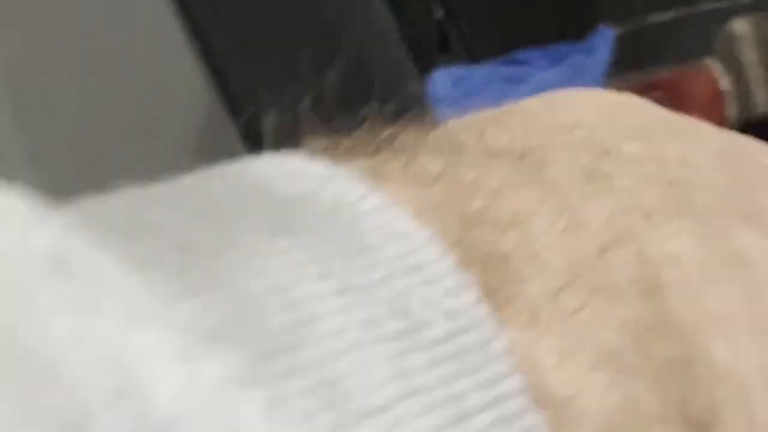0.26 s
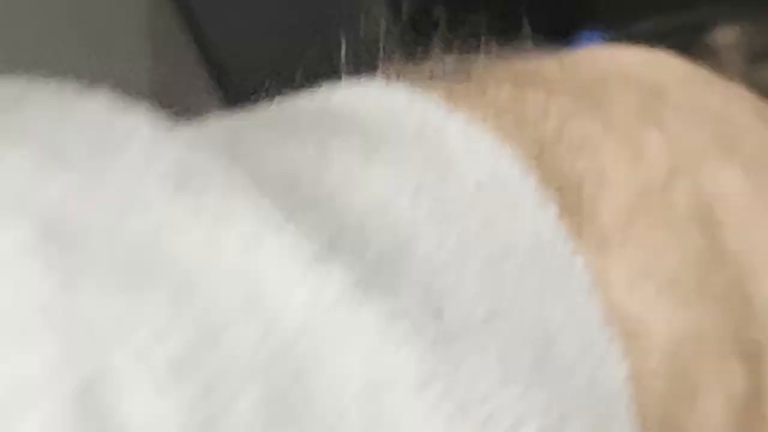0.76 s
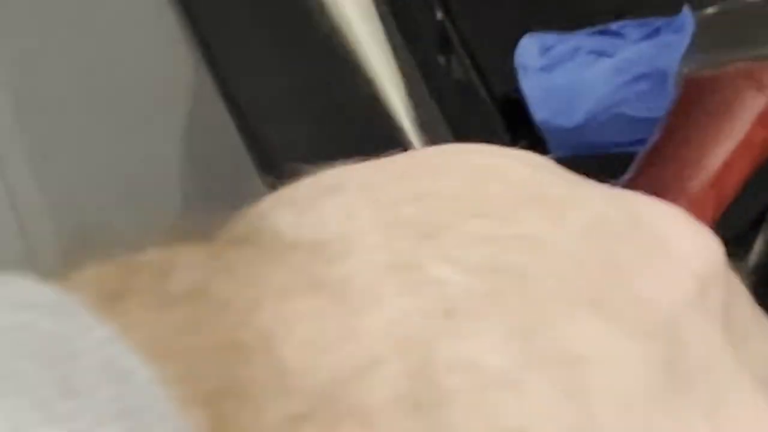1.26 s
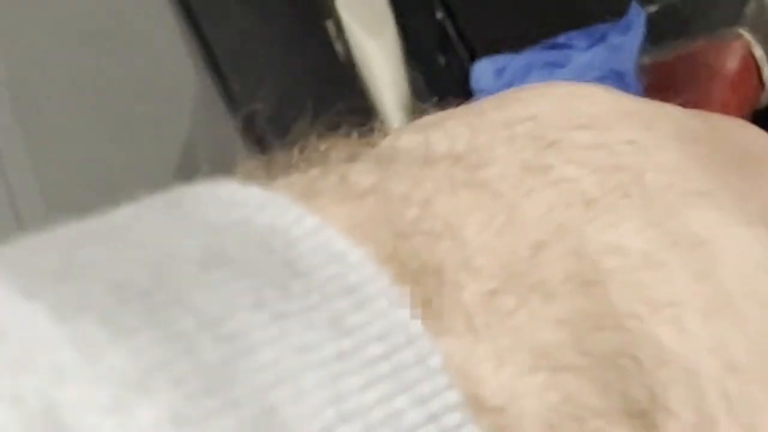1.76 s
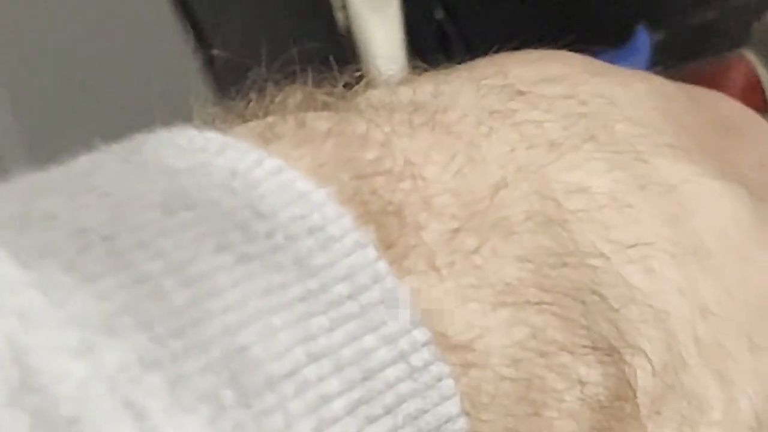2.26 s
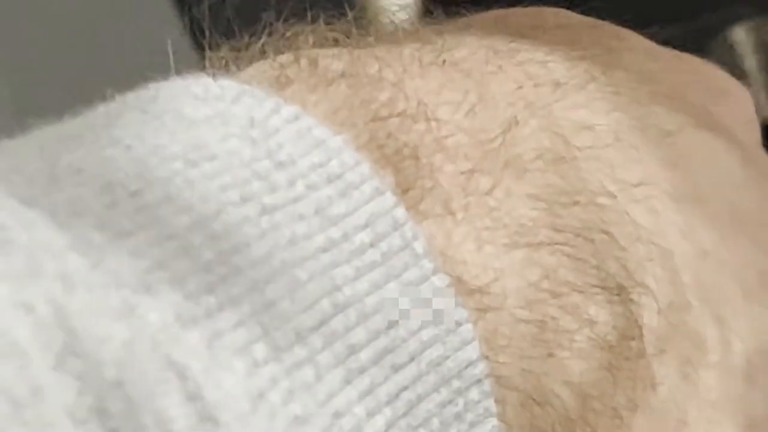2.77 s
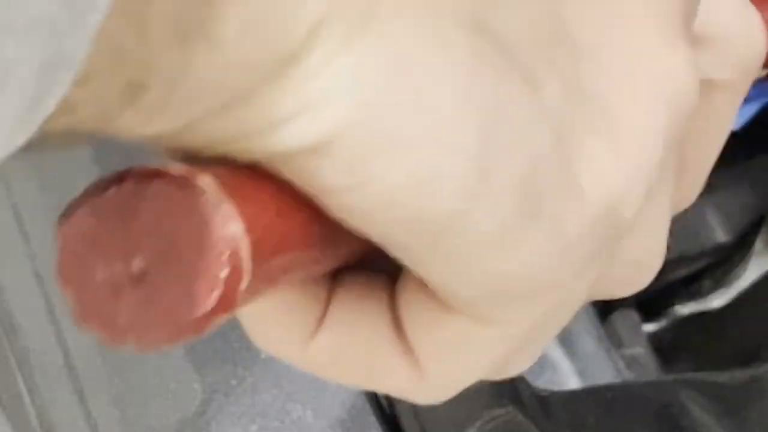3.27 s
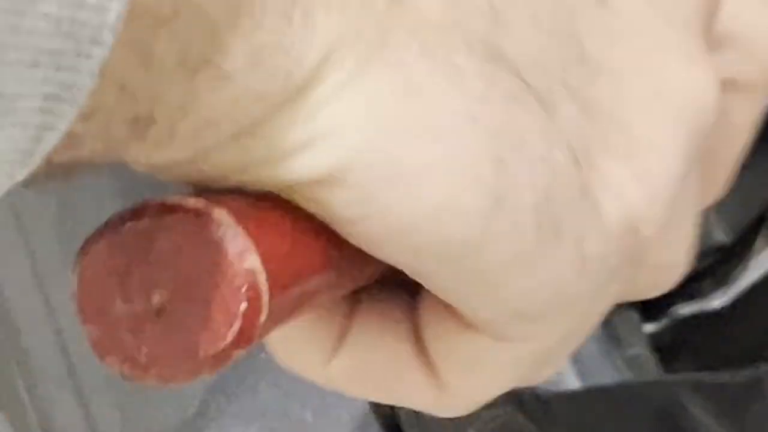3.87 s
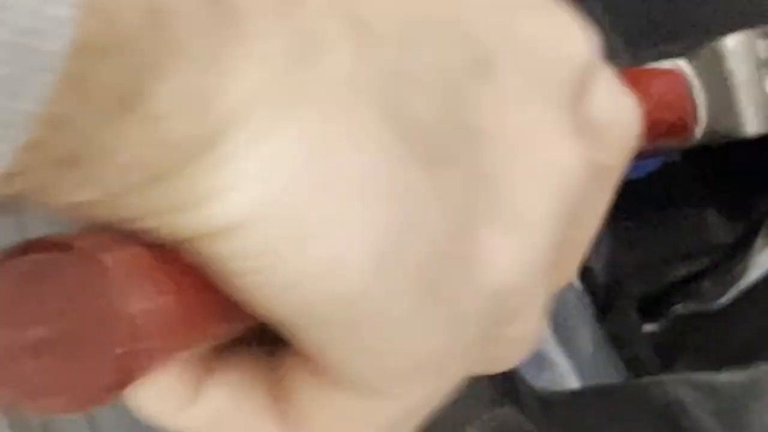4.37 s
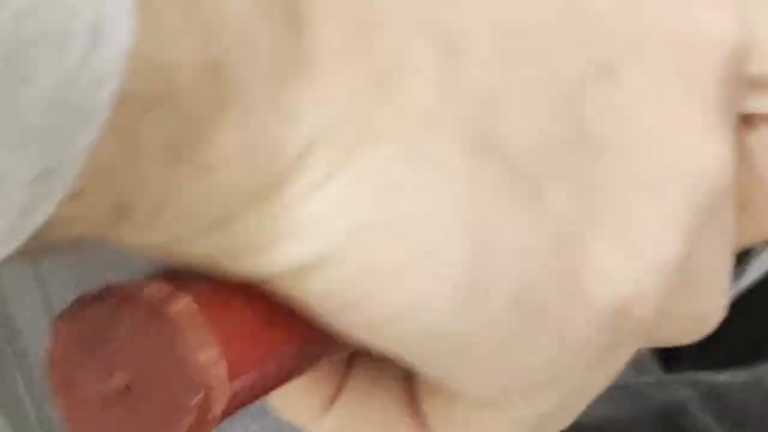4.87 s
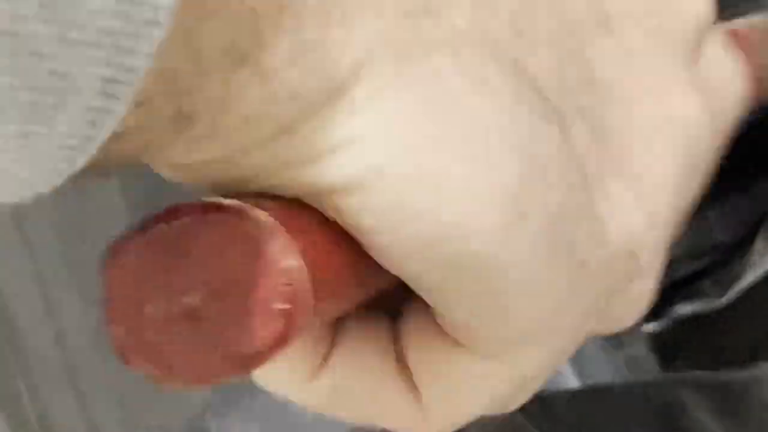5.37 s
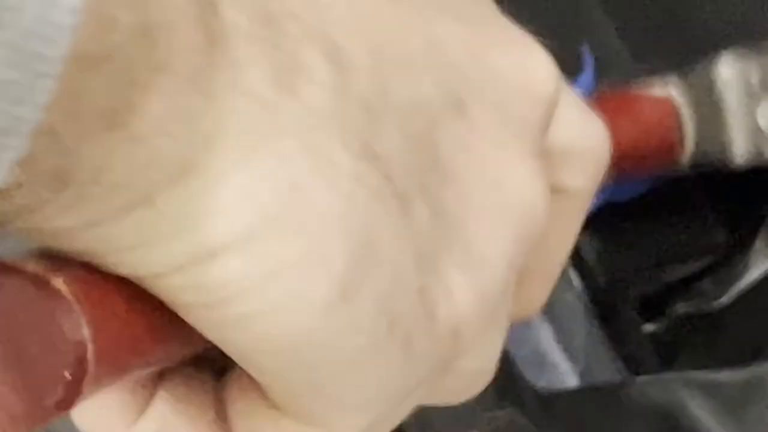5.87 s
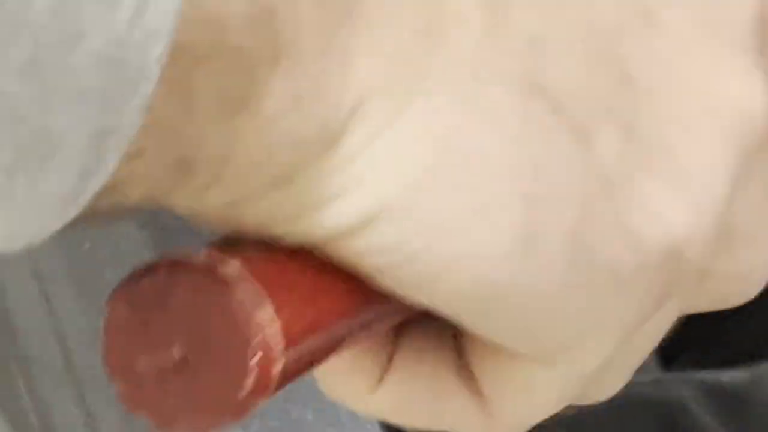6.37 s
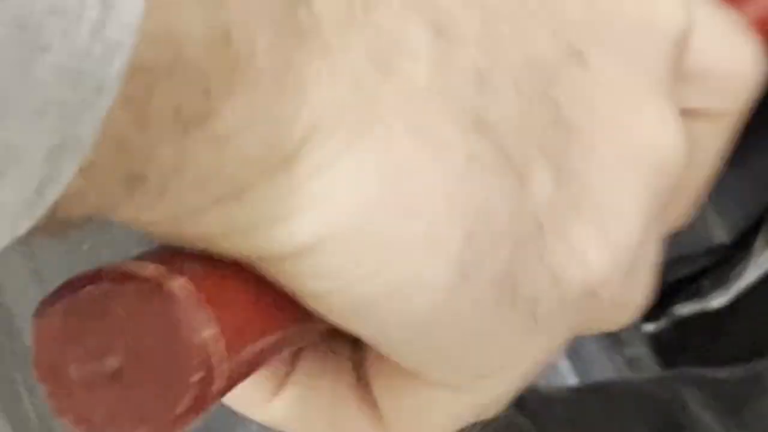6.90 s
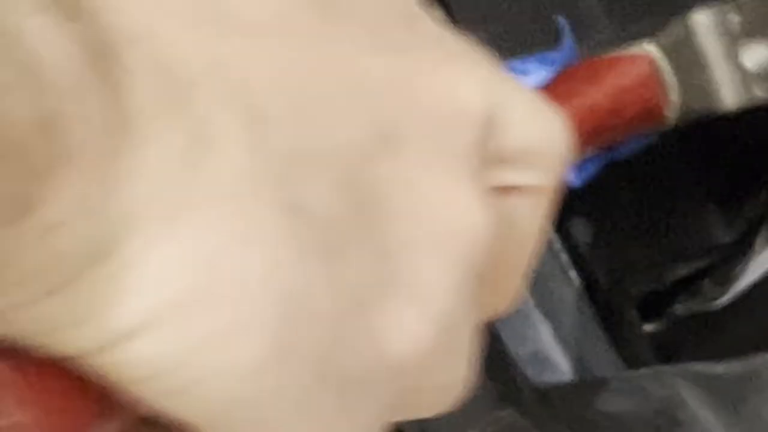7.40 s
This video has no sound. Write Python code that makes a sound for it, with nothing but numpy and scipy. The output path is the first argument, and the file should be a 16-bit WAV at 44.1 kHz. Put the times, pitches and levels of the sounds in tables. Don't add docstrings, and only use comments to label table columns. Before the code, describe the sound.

Close stereo pickup of hand metalwork: sparse, soft clinks on a bracket over low, bass-heavy air, growing a little firmer before three seconds. After a sudden cut comes a short clattering scrape, then a regular series of far louder steel-on-steel strikes, with one uneven double hit. The blows have a hollow low boom, dull midrange clank and bright snap, and the garage answers with a diffuse wash.

```python
import sys
import numpy as np
from scipy import signal
from scipy.fft import rfft, irfft, next_fast_len
from scipy.io import wavfile
from scipy.ndimage import uniform_filter1d

SR = 44100
rng = np.random.default_rng(int(sys.argv[2]) if len(sys.argv) > 2 else 0)


def gain_from_db(level_db):
    decades = np.asarray(level_db, float) / 20
    return 10 ** decades


def dump_mix(stems):
    frames = np.atleast_2d(stems).T
    limited = np.clip(frames, -1, 1)
    pcm = np.round(limited * 32767).astype(np.int16)
    wavfile.write(sys.argv[1], SR, pcm)


N = 336945

CHANGE_S = 3.022
FIRST_TOUCH_S = .0018
BAND_EDGES = 28 * 2 ** np.arange(0, 9.6, .5)
# f/Hz, level/dB, t60/s
TAB_TAPPED = [(500, -7, .1), (603, -7, .15), (720, -12, .25), (834, -9, .1), (940, -9, .13),
              (1100, -14, .08), (1250, -11, .08), (1430, -15, .22), (1500, -15, .25), (1700, -14, .12),
              (2200, -20, .1), (2520, -22, .13), (3250, -27, .15)]
# f/Hz, t60/s
GARAGE_T60 = [(100, 0.49), (300, 0.8), (1000, 0.84), (3000, 0.98), (7000, 0.75), (13000, 0.35)]
# f/Hz, level/dB
PORT_SPREAD = [(60, -12), (200, -13.5), (450, -9.5), (1200, -5.5), (2000, -89), (4000, -19.5), (12000, -25)]


def all_hits():
    # t/s, peak/dB, thud/dB, crack/dB (both against the peak), thump/Hz
    taps = [
        (0.004, -59, 12, -7, 308),
        (0.469, -33.5, -1.5, -18.5, 190),
        (0.751, -38.5, -9, -21, 342),
        (0.76, -27.5, -11.5, -23.5, 305),
        (1.747, -24, -4.5, -21, 257),
        (2.532, -27, -1, -19, 293),
        (2.744, -29, -25, -36, 213),
        (2.755, -18, -4, -8.5, 201),
    ]
    setting = [
        (3.039, -38, -8, -10, 200),
        (3.051, -49.5, -14, 2, 200),
        (3.065, -49.5, 8.5, -2, 214),
        (3.077, -49.5, 19, -27, 278),
        (3.085, -57, 22, -16, 242),
        (3.153, -68, -10, -23, 183),
        (3.163, -68, -16, -27, 180),
    ]
    # t/s, peak/dB, crack/dB
    square = [(3.706, -2, -16), (4.027, -1, -12.5), (4.33, -0.5, -9.5), (4.642, 0, -8.5), (4.953, 0, -8.5),
              (5.25, -0.5, -10), (5.539, -0.5, -9), (5.838, -1.5, -9), (6.455, -1.5, -10), (6.74, -1, -6.5),
              (7.04, -0.5, -12), (7.39, -1, -10)]
    glancing = [
        (3.375, -8, -14.5, -21, 421),
        (3.38, -11, -2, -13, 238),
        (3.432, -39, -22, -1, 172),
        (6.137, -10.5, -6.5, -8, 258),
        (6.143, -14.5, -54, -33, 223),
        (7.607, -41, -12, -13, 158),
        (7.615, -23.5, 5.5, -8, 220),
    ]
    # t/s, peak/dB, thud/dB, thump/Hz
    soft = [(0.057, -73, 20, 320), (0.399, -70, 11, 149), (0.674, -53, 3, 230), (1.256, -59, -5, 253),
            (2.017, -57, -14, 283), (2.061, -53, -5, 221), (2.092, -49.5, 5, 227), (2.146, -56, 9, 229),
            (2.269, -60.5, 2, 212), (2.317, -53, 4, 176), (2.337, -58.5, 8, 173)]

    nudges = [(s, peak_db, thud_db, -51, hz) for s, peak_db, thud_db, hz in soft]
    blows = [(s, peak_db, -8.5, crack_db, 224.2) for s, peak_db, crack_db in square]
    kinds = [(taps, -18), (nudges, 0.1), (setting, -2.5), (blows + glancing, -12)]
    rows = []
    for kind, sparkle_db in kinds:
        for s, peak_db, thud_db, crack_db, thump_hz in kind:
            rows.append((s, peak_db, thud_db, crack_db, crack_db + sparkle_db, thump_hz))
    rows.sort()
    return [row for row in rows if row[0] < CHANGE_S], [row for row in rows if row[0] > CHANGE_S]


def frame(hits, panel, tab, panel_db, tab_db, thump_db, head_db):
    # f/Hz, level/dB, t60/s
    head = [(3110, -15, 0.15), (3360, -9, 0.082), (3550, -11, 0.013), (3900, -11, 0.084), (4260, -9, 0.025),
            (4900, -20, .05), (5290, -8, 0.031), (6300, -28, 0.027), (7150, -32, 0.023), (8200, -21, .03)]
    s, peak_db, thud_db, crack_db, _, thump_hz = np.transpose(hits)
    out = struck(hits, peak_db + thud_db + panel_db, panel, spread_db=2.5, rise_s=0.0063, longest_s=0.7)
    out += struck(hits, peak_db + tab_db, tab, spread_db=2.5, rise_s=0.0009, longest_s=.45)
    out += struck(hits, peak_db + crack_db + head_db, head, spread_db=0.0, rise_s=.0006, longest_s=.2)
    t = np.arange(int(.15 * SR)) / SR
    starts = ((s - FIRST_TOUCH_S) * SR).astype(int)
    for at, level_db, hz in zip(starts, peak_db + thud_db + thump_db, thump_hz):
        envelope = gain_from_db(level_db - 60 * t / 0.085) * (1 - np.exp(-t / 0.0029))
        thump = envelope * np.sin(2 * np.pi * hz * t)
        out[at:at + len(t)] += thump[:N - at]
    return out


def struck(hits, level_db, modes, spread_db, rise_s, longest_s):
    chance = rng.standard_normal((len(hits), len(modes)))
    out = 0
    for k, (hz, mode_db, t60) in enumerate(modes):
        push = clicks(hits, level_db + mode_db + spread_db * chance[:, k]) * (-1) ** k
        out = out + ring(push, hz, min(t60, longest_s)) - ring(push, hz, min(rise_s, t60 / 2))
    return out


def cracks(groups, level_db):
    # f/Hz, level per Hz/dB
    crack_colour = [(60, -29), (120, -13.5), (250, -2), (600, -9), (1400, -11), (2200, -9), (4000, -12.5),
                    (7500, -17.5), (10500, -10.5), (14000, -8.5), (16500, -3)]
    # f/Hz, t60/s
    crack_t60 = [(100, 0.16), (500, 0.11), (2000, 0.051), (6000, 0.077), (13000, 0.058)]
    # f/Hz, level/dB
    wash_colour = [(100, -16.5), (300, -10), (1000, -24.5), (3000, -26.5), (7000, -16), (13000, -22)]
    wash_t60_share, wash_lift_db = (0.81, 0.94), (3.7, 1.28)

    out = np.zeros((len(groups), 2, N))
    for hz, (burst, *wash) in bands(size=N, channels=3):
        press = int(min(.009, 12 / hz) * SR)
        thud_share = np.interp(np.log(hz), np.log([300, 600]), [1, 0])
        crack_share = np.interp(np.log(hz), np.log([1500, 3000, 8000, 11000]), [0, 1, 1, 0])
        sparkle_share = np.interp(np.log(hz), np.log([8000, 11000]), [0, 1])
        apart = gain_from_db(1.2 * flicker(rate=32)) * [[1], [gain_from_db(at_hz(PORT_SPREAD, hz) + 7.5)]]
        for g, hits in enumerate(groups):
            s, peak_db, thud_db, crack_db, sparkle_db, _ = np.transpose(hits)
            colour_db = thud_share * thud_db + crack_share * crack_db + sparkle_share * sparkle_db
            colour_db += 1.7 * rng.standard_normal(len(s))
            push = clicks(hits, peak_db + colour_db + level_db + at_hz(crack_colour, hz))
            pressed = uniform_filter1d(push, press, origin=(press - 1) // 2)
            out[g, 0] += swell(pressed, 0.34 / hz, at_hz(crack_t60, hz)) * burst
            wash_swell = swell(push, 0.0019, wash_t60_share[g] * at_hz(GARAGE_T60, hz))
            out[g] += gain_from_db(at_hz(wash_colour, hz) + wash_lift_db[g]) * wash_swell * wash * apart
    return out


def shell(sound, peaks):
    for hz, width_hz, lift_db in peaks:
        peak = signal.lfilter(*signal.iirpeak(hz, hz / width_hz, fs=SR), sound)
        sound = sound + (gain_from_db(lift_db) - 1) * peak
    return sound


def through_frame(sound, modes, lift_db):
    width = 1 - gain_from_db(-60 / (0.072 * SR))
    peaks = sum((-1) ** k * 2 * width * ring(sound, hz, 0.0087) for k, (hz, _, _) in enumerate(modes))
    return sound + gain_from_db(lift_db) * peaks


def shuffle():
    # t/s, rattle/dB, rise/s, fall/s
    shifts = [
        (0.0, -73, .01, 0.13),
        (.41, -74, 0.045, .4),
        (.62, -65, 0.27, 0.37),
        (.75, -63.5, .2, 0.27),
        (1.27, -80, .05, 0.62),
        (2.18, -77, .15, .05),
        (2.5, -75, 0.37, 0.83),
        (3.059, -41, 0.028, 0.024),
        (3.157, -49.5, 0.014, 0.023),
    ]
    # t/s, level/dB, rise/s, fall/s, f/Hz
    rubs = [
        (.55, -88, .05, .08, 8400),
        (.66, -95, .3, .15, 3520),
        (1.29, -85, .08, .25, 4180),
        (2.02, -88, .015, .03, 4900),
        (2.065, -87, .02, 0.055, 3300),
        (2.34, -78, .03, 0.37, 2240),
        (2.42, -91, .06, .3, 3470),
        (2.6, -71, .08, .3, 2550),
        (3.15, -60, .02, .03, 2300),
    ]
    # t/s, level/dB
    edge_ticks = [
        (.468, -70),
        (.76, -65),
        (2.532, -54),
        (3.046, -51),
        (3.063, -41),
        (3.077, -58),
        (3.085, -39),
        (3.155, -62),
        (3.433, -39),
    ]

    grains = (rng.random(N) < 1000 / SR) * gain_from_db(rng.exponential(1, N)) * rng.choice([-1, 1], N)
    rattle = sum(gain_from_db(.5 * mode_db) * ring(grains, hz, t60=.015) for hz, mode_db, _ in TAB_TAPPED)
    rasp = signal.sosfilt(signal.butter(2, [2200, 13000], "band", fs=SR, output="sos"), grains)
    moving = np.maximum(np.max([gesture(*row) for row in shifts], axis=0), gain_from_db(-93))
    out = moving * (rms_one(rattle) + gain_from_db(-18) * rms_one(rasp))

    friction = rng.standard_normal(N)
    for *row, hz in rubs:
        out += gesture(*row) * rms_one(ring(friction, hz, t60=74 / hz))
    ticks = sum(gesture(s, level_db, rise_s=.002, fall_s=0.0051) for s, level_db in edge_ticks)
    return out + ticks * signal.lfilter([1, -.8], [1], friction)


def garage(dry):
    # f/Hz, level/dB
    tail_colour = [(100, -10), (300, -6), (1000, -11), (3000, -13), (7000, -33), (13000, -17)]
    size = int(1.1 * SR)
    t = np.arange(size) / SR
    tail = np.zeros((2, size))
    for hz, noise in bands(size=size, channels=2):
        t60 = at_hz(GARAGE_T60, hz)
        gain = gain_from_db(at_hz(tail_colour, hz) - 60 * t / t60) / np.sqrt(t60 * SR / 14)
        tail += gain * noise * [[1], [gain_from_db(at_hz(PORT_SPREAD, hz))]]
    tail *= 1 - np.exp(-t / 0.0025)
    tail[0, 0] = 1
    return signal.fftconvolve(dry[:, None], tail[None], axes=2)[..., :N]


def hum():
    # f/Hz, level per Hz/dB
    air_colour = [(25, -12), (40, -10), (60, 3.5), (100, -3), (160, -15.5), (300, -20), (600, -28),
                  (1200, -47), (2500, -44), (5000, -58), (9000, -48), (16000, -54)]
    air = sum(gain_from_db(at_hz(air_colour, hz)) * noise * [[1], [gain_from_db(-17.0)]]
              for hz, noise in bands(size=N, channels=2))
    t = np.arange(N) / SR
    throb = 1 + .8 * np.sin(2 * np.pi * 30 * t)
    whine = gain_from_db(-93) * throb * np.sin(2 * np.pi * 13550 * t)
    return gain_from_db(-59.5) * air / np.std(air[0]) + whine * [[1], [0]]


def ports(common, differing):
    # f/Hz, phase/rad
    port_phase = [(0, 0), (2300, 0), (3800, .6), (6400, 0), (8400, -.9), (9600, -.9 * np.pi),
                  (10600, -1.1 * np.pi), (13400, -2 * np.pi), (16500, -9)]
    size = next_fast_len(N + 999)
    lead = np.interp(np.arange(size // 2 + 1) * SR / size, *np.transpose(port_phase))
    turn = np.exp(.5j * lead * np.array([[1], [-1]]))
    return irfft(rfft(common, size) * turn, size)[:, :N] + differing * [[1], [-1]]


def clicks(hits, level_db):
    out = np.full(N, 1e-18)
    out[((np.array(hits)[:, 0] - FIRST_TOUCH_S) * SR).astype(int)] = gain_from_db(level_db)
    return out


def ring(force, hz, t60):
    r, w = gain_from_db(-60 / (t60 * SR)), 2 * np.pi * hz / SR
    return signal.lfilter([0, np.sin(w)], [1, -2 * r * np.cos(w), r * r], force)


def swell(push, rise_s, t60):
    rise, fall = np.exp(-1 / (rise_s * SR)), gain_from_db(-60 / (t60 * SR))
    return signal.lfilter([1 - rise], np.convolve([1, -fall], [1, -rise]), push)


def gesture(s, level_db, rise_s, fall_s):
    t = np.arange(N) / SR - s
    return gain_from_db(level_db - 20 * np.maximum(t / fall_s, -t / rise_s))


def flicker(rate):
    steps = rng.standard_normal(int(N / SR * rate) + 2)
    return np.interp(np.arange(N) / SR * rate, np.arange(len(steps)), steps)


def bands(size, channels):
    white = rng.standard_normal((2, channels, size))
    for k, (low, high) in enumerate(zip(BAND_EDGES, BAND_EDGES[1:])):
        band = signal.butter(2, [low, high], "band", fs=SR, output="sos")
        yield np.sqrt(low * high), signal.sosfilt(band, white[k % 2])


def at_hz(points, hz):
    point_hz, value = np.transpose(points)
    return np.interp(np.log(hz), np.log(point_hz + 1), value)


def rms_one(x):
    return x / np.sqrt(np.mean(x ** 2) + 1e-20)


def scene():
    # f/Hz, level/dB, t60/s
    panel_tapped = [(172, -2, 0.098), (213.4, -4, 0.3), (258, -17, 0.061), (307.5, -6, 0.48),
                    (374, -18, 0.27), (461.9, -4, 0.33)]
    panel_struck = [(64, -26, .6), (101, -12, .45), (122, -12, .35), (140, -10, .45), (153, -9, .45),
                    (172, 0, .3), (195, -9, .2), (220, 0, .36), (238, -14, .2), (276, -10, .25),
                    (308, -8, .33), (352, -10, .3), (385, -12, .3), (431, -9, .3)]
    # f/Hz, level/dB, t60/s
    tab_struck = [(495, -6, .15), (600, -2, .15), (714, -7, .12), (840, -5, .12), (944, -5, .15),
                  (1100, -4, .1), (1310, -1, .12), (1365, -3, .1), (1445, -13, .4), (1468, -13, .35),
                  (1480, -2, .07), (1575, 0, .08), (1720, -6, .06), (1876, -3, .09), (2230, -10, .07),
                  (2610, -8, .07), (3050, -10, .07)]
    # f/Hz, width/Hz, lift/dB
    shell_tapped = [(1440, 100, 1.5), (3300, 230, 2.5), (5460, 680, -2), (7200, 400, 5)]
    shell_struck = [(1440, 130, 6), (3650, 320, 4), (5100, 4200, -2.5), (7740, 500, 4)]

    light_hits, hard_hits = all_hits()
    taps = frame(light_hits, panel_tapped, TAB_TAPPED, panel_db=-11.0, tab_db=-8.0, thump_db=1.5, head_db=1.0)
    blows = frame(hard_hits, panel_struck, tab_struck, panel_db=-6.0, tab_db=-15.0, thump_db=4.5, head_db=-2.0)
    light_crack, hard_crack = cracks([light_hits, hard_hits], level_db=16.0)
    hands = shuffle()
    first, second = garage(np.array([taps + hands, blows + hands]))
    first += through_frame(shell(light_crack, shell_tapped), TAB_TAPPED, lift_db=-22.0)
    second += through_frame(shell(hard_crack, shell_struck), tab_struck, lift_db=4.0)

    air = hum()
    t = np.arange(N) / SR
    fade_out = np.clip((CHANGE_S - t) / 0.0032, 0, 1)
    fade_in = np.clip((t - CHANGE_S - .008) / 0.01, 0, 1)
    common, differing = fade_out * (first + air) + fade_in * (second + air)
    return ports(common, differing) * gain_from_db([[-.3], [.3]])


def band_limit(x):
    return signal.sosfilt(signal.butter(12, 16820, fs=SR, output="sos"), x)


def record(dry):
    over_db = np.maximum(20 * np.log10(np.abs(dry).max(axis=0) + 1e-9) + 1, 0)
    slope = 250 * np.arange(N) / SR
    held_db = np.maximum.accumulate(over_db + slope) - slope
    held_db = signal.lfilter([.1], [1, -.9], held_db)
    held = 1.1 * np.tanh(dry * gain_from_db(-held_db) / 1.1)
    held = signal.sosfilt(signal.butter(3, 40, "high", fs=SR, output="sos"), held)
    held = signal.sosfilt(signal.cheby2(10, 60, 16900, fs=SR, output="sos"), held)
    return band_limit(held)


dry = scene()
out = record(dry)
dump_mix(out)
```